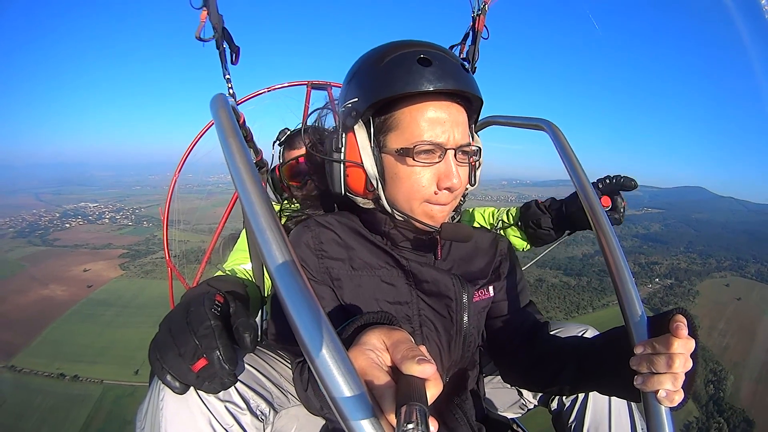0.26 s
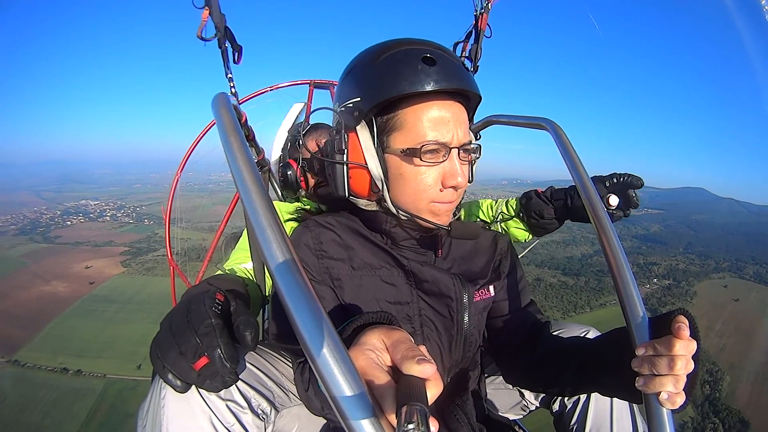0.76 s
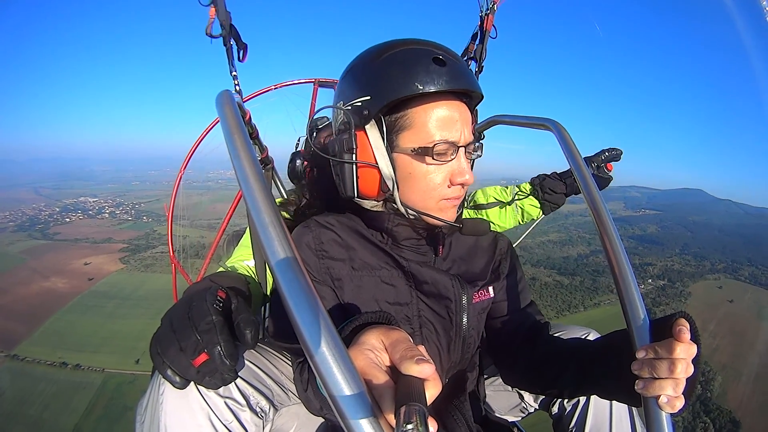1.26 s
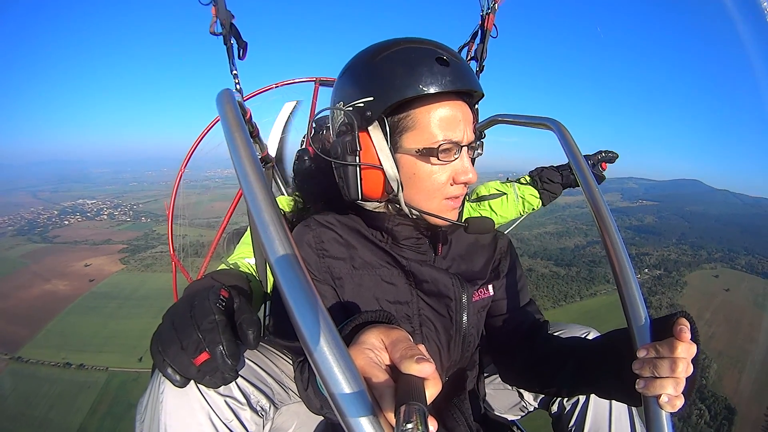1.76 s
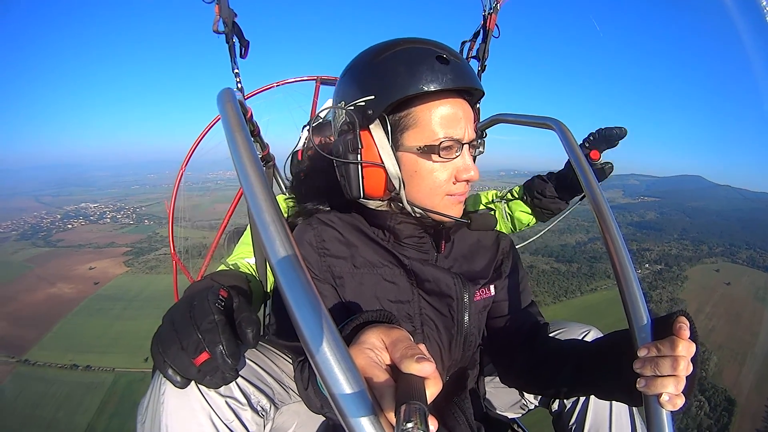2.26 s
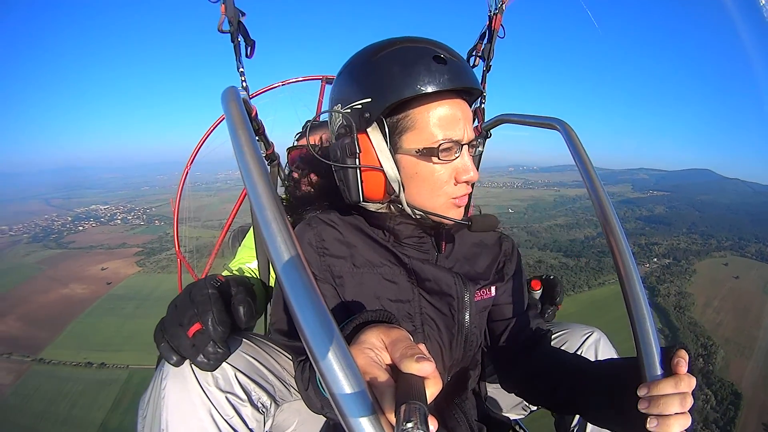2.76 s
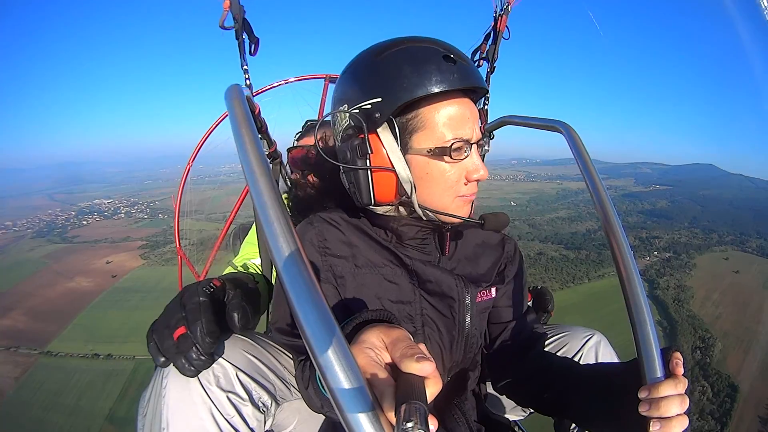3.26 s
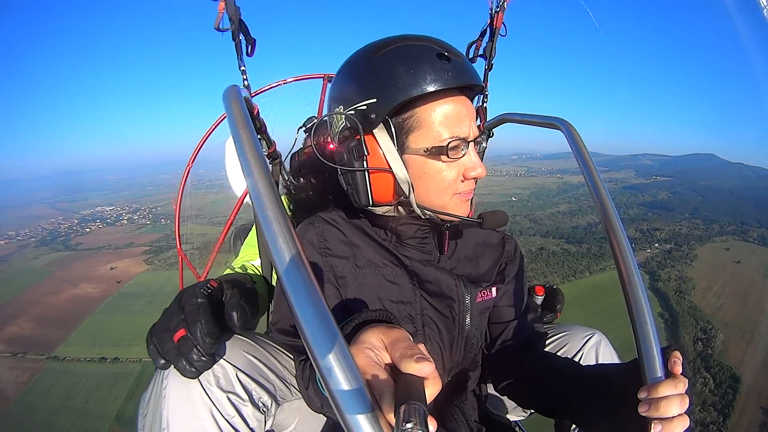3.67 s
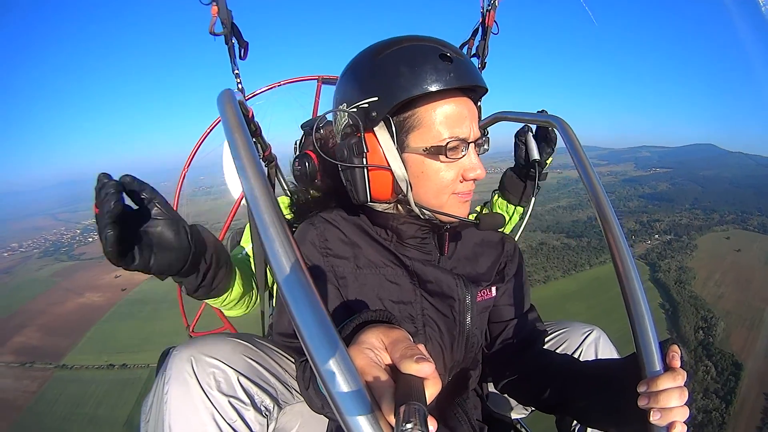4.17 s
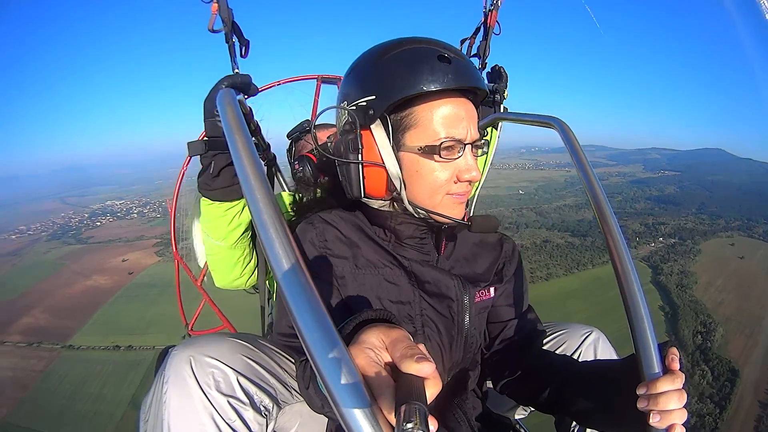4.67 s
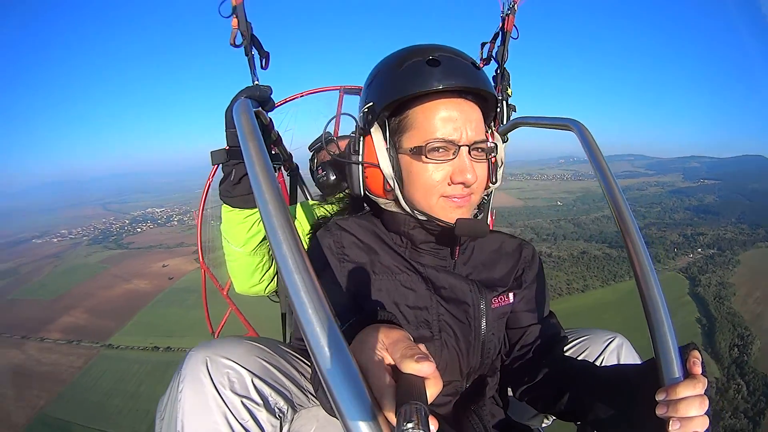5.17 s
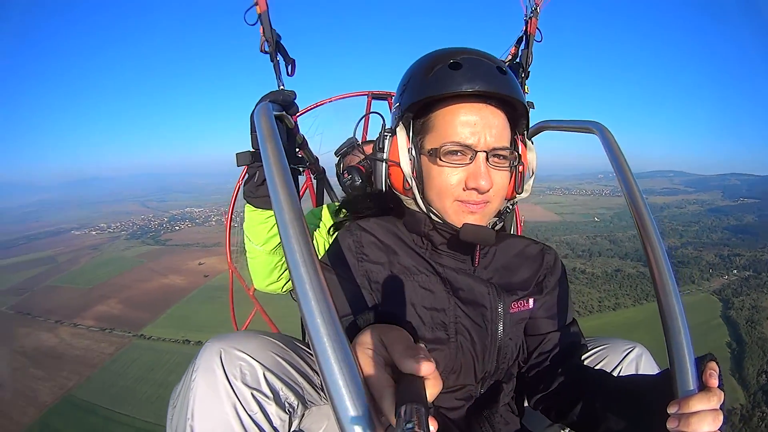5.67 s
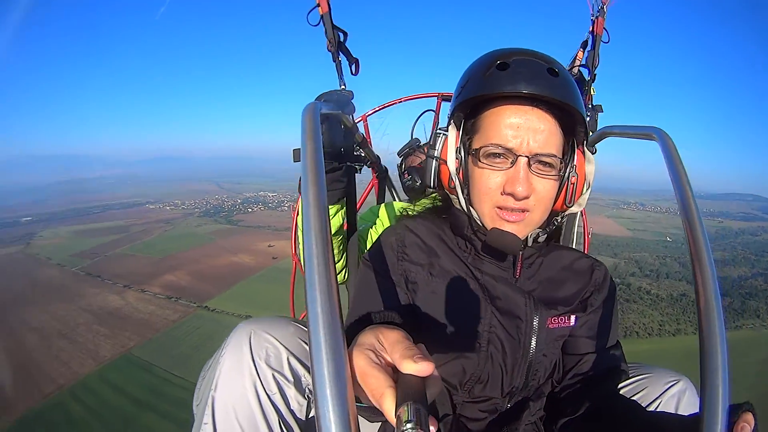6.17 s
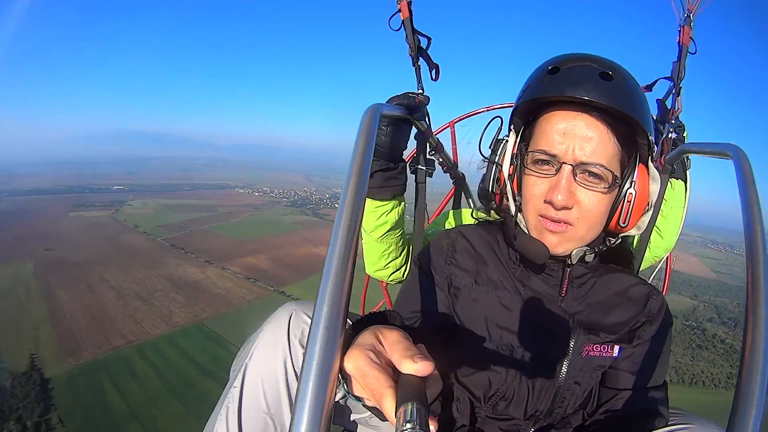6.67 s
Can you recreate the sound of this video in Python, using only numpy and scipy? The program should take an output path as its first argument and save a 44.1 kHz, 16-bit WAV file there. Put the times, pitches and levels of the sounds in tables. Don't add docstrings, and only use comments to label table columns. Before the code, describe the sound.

From 0 to almost 7 seconds a small two-stroke engine runs without pause, its firing rate near 143 to 145 per second, wavering only slightly. Close to the camera, a three-blade propeller in a cage makes a dense fluttering rush, about 84 beats a second, ringing hard around 1.5 and 2.6 kilohertz. Bright hiss, leaning left at first, and a cluster of thin gear whines near 4 to 7 kilohertz sit over low exhaust and blade hums. About 28 times a second a knock ticks and thuds through the mount, briefly dipping the airborne sound, with low hum and wind beneath. At 4.6 to 5.2 seconds the grip loosens in an uneven rattle; only a few faint knocks follow to 5.8. Hum and wind recede, exhaust notes strengthen, and around 6 seconds the tone turns brighter, the whine shifts and the engine becomes more centred. Treble stops near 11 kilohertz.

```python
import sys
import numpy as np
from scipy import signal
from scipy.fft import rfft, irfft, next_fast_len
from scipy.io import wavfile

SR = 44100
rng = np.random.default_rng(int(sys.argv[2]) if len(sys.argv) > 2 else 0)


def gain_from_db(level_db):
    decades = np.asarray(level_db, float) / 20
    return 10 ** decades


def wav_out(sig):
    wavfile.write(sys.argv[1], SR, np.round(np.clip(np.atleast_2d(sig).T, -1, 1) * 32767).astype(np.int16))


N = 305172
SIZE = next_fast_len(N)

# t/s, slackness 0-2
GRIP = [
    (0, 0),
    (4.5, 0.0038),
    (4.85, 0.77),
    (5.3, 1.03),
    (5.95, 1.27),
    (6.5, 1.95),
    (6.92, 2),
]
# t/s, aim 0-3
AIM = [
    (0, 0),
    (1.7, -0.06),
    (2.2, 1),
    (3.85, 1.03),
    (4.3, 2),
    (5.8, 2),
    (6.3, 3),
    (6.92, 3),
]


def blades(turns):
    # aim 0-3, lower ring level/dB, upper ring level/dB, upper ring f/Hz, left-right/dB
    rings = [(0, -27, -23, 2670, 1.5), (1, -27, -23, 2590, 2), (2, -28.5, -22.5, 2560, 1.5),
             (2.1, -29, -22, 2480, 1), (2.6, -28.5, -21.5, 2480, 3), (3, -25, -21, 2850, 1)]
    lower_db, upper_db, upper_hz, pan_db = follow(AIM, rings)
    passes = 3 * turns + .15
    strength = strengths(passes, 2.8)
    spokes = 1 + .25 * np.cos(8 * np.pi * passes)
    rush = (.55 + np.exp(-(passes % 1) / .4) * strength) * spokes
    sizes = gain_from_db(1.8 * np.minimum(rng.exponential(1, (2, N)), 3)) * rng.choice([-1., 1.], (2, N))
    slaps = (rng.random((2, N)) < 500 * np.minimum(rush, 1.6) ** 2 / SR) * sizes
    drive = rush * rng.standard_normal((2, N)) + 0.59 * evened(slaps)
    beat = evened(beats(passes - .03) * strength)

    low_drive = drive + 0.6 * beat
    lower = resonate(resonate(low_drive, 1560, 390), 2210, 900)
    lower += 1.74 * resonate(low_drive, 1605, 82)
    high_drive = drive + 0.51 * gain_from_db(upper_db + 23.5) * beat
    upper = resonate(resonate(high_drive, upper_hz, 585), upper_hz, 2600)
    return ports(gain_from_db(lower_db) * evened(lower) + gain_from_db(upper_db) * evened(upper), pan_db)


def engine(firings):
    # aim 0-3, hiss level/dB, hiss brightness/dB, left-right/dB
    engine_side = [(0, -18.5, -1.5, 8), (1, -19.5, -1, 7.5), (2.1, -20.5, 2, 6.5), (2.7, -19.5, 3, 3),
                   (3, -22, 4.5, .5)]
    # f/Hz, level/dB per Hz
    hiss_spectrum = [(500, -20), (850, -27), (1150, -20), (1560, -6.5), (2050, -9), (2600, -1.5),
                     (3600, -7.5), (4400, -7.5), (5900, -6), (6350, -11), (6850, -8), (7700, -13),
                     (9300, -22.5), (11300, -30)]
    # multiple of firing rate, level/dB, loudest aim 0-3, loss/dB per step of aim
    whine_notes = [(30, -39, 1.2, 2), (31, -41, 0, 2), (33, -39, 3, 5), (35, -39, 1.6, 5),
                   (38, -38, 2.2, 14), (39, -40, 2.6, 6), (40, -37, 2.2, 12), (41, -36, 2.1, 8),
                   (42, -32, 2, 9), (42, -33, 3, 16), (43, -40, 0, 9), (44, -38, 3, 16), (45, -39, 2.1, 6),
                   (46, -41, 0, 8), (47, -37, 1.1, 4), (47, -36, 3, 10), (48, -35, 3, 16), (49, -38, 3, 12),
                   (51, -44, 0, 2)]
    hiss_db, bright_db, pan_db = follow(AIM, engine_side)
    puffs = (1 + .5 * np.exp(-(firings % 1) / 0.27)) * gain_from_db(0.84 * drift(16)[0])
    one_rattle = rng.standard_normal(306)
    rattle = signal.oaconvolve(beats(firings), one_rattle)[:N]
    rattle = evened(resonate(rattle, 5260, 5000))
    hiss = colour(puffs * rng.standard_normal((2, N)) + .16 * rattle, hiss_spectrum)
    hiss += (gain_from_db(bright_db) - 1) * resonate(hiss, 8800, 4400)

    aim, whine = curves(AIM)[0], np.zeros(N)
    wobble = firings + 0.002 * drift(30)[0]
    for (k, db, best, lost_db), fade in zip(whine_notes, drift(14, count=len(whine_notes))):
        level_db = db + 7.5 - lost_db * abs(aim - best) + 2.4 * fade
        whine += gain_from_db(level_db) * np.cos(2 * np.pi * (k * wobble + rng.random()))
    skew = 0.047 * pan_db * np.roll(whine, shift=2) * [[1], [-1]]
    panned = whine * gain_from_db([pan_db / 2, -pan_db / 2]) / gain_from_db(0.12 * abs(pan_db))
    return ports(gain_from_db(hiss_db) * hiss, pan_db) + skew + panned


def notes(cycles, orders, level_db):
    out = np.zeros((2, N))
    for (k, db), waver in zip(orders, drift(8, count=len(orders))):
        start = rng.random() + .12 * rng.random((2, 1))
        out += gain_from_db(db + 1.1 * waver) * np.cos(2 * np.pi * (k * cycles + start))
    return gain_from_db(level_db) * evened(out)


def shaft_notes(firings, turns):
    # slackness 0-2, exhaust level/dB, blade level/dB, frame buzz level/dB
    note_levels = [(0, -43, -42.5, -43.5), (.9, -40.5, -44, -46), (1.1, -36, -45.5, -47),
                   (2, -34, -44, -47)]
    # multiple of firing rate, level/dB
    exhaust = [(.5, -15), (1, -2), (1.5, -18), (2, -1), (2.5, -3), (3, -23), (8, -8), (8.5, -8.5)]
    # multiple of blade passing rate, level/dB
    blade_note = [(1, -14), (2, -12), (3, -1.5), (4, -2), (5, -14), (6, -10), (7, -9.5), (8, -10.5),
                  (9, -13.5), (11, -23), (12, -12.5), (13, -10.5)]
    exhaust_db, blade_db, frame_db = follow(GRIP, note_levels)
    frame = gain_from_db(frame_db) * np.sqrt(2) * np.cos(2 * np.pi * firings) * [[1], [-1]]
    return frame + notes(firings, exhaust, exhaust_db) + notes(3 * turns, blade_note, blade_db)


def knocks(turns):
    # t/s, peak level/dB
    strays = [(4.621, -34.5), (4.644, -23), (4.686, -21), (4.718, -25), (4.75, -24), (4.835, -25),
              (4.939, -25), (5.006, -23.5), (5.041, -25.5), (5.075, -26), (5.107, -26), (5.145, -23),
              (5.2, -31), (5.416, -31), (5.475, -30), (5.72, -31), (5.81, -29)]
    steady_until = 4.6
    draw = rng.standard_normal((int(turns[-1]), 2))
    at = np.searchsorted(turns, np.arange(len(draw)) + .25 + .05 * draw[:, 0])
    train = np.zeros(N)
    heights = gain_from_db(2.8 * np.clip(draw[:, 1], -3, 1.1))
    train[np.clip(at, 0, N - 1)] = heights * (at < steady_until * SR)
    s, peak_db = np.transpose(strays)
    train[((s - .004) * SR).astype(int)] = gain_from_db(peak_db + 22.5)
    return train


def mount(turns, train):
    # slackness 0-2, hum level/dB, wind level/dB, shake level/dB, rumble level/dB
    carried = [(0, -34.5, -40, -51, -49), (1.2, -40.5, -49.5, -49, -43.5), (2, -46, -49.5, -70, -53)]
    # f/Hz, level/dB per Hz
    wind_spectrum = [(60, -8), (130, -12), (220, 3), (350, 1.5), (600, -2.5), (900, -24), (1400, -59)]
    hum_db, wind_db, shake_db, rumble_db = follow(GRIP, carried)
    t = np.arange(1500) / SR
    buzz = rng.standard_normal((3, N))

    tick = np.exp(-((t - .0018) / 0.00035) ** 2) * np.cos(2 * np.pi * 2500 * t)
    ticks = evened(signal.oaconvolve(np.minimum(train, 1.5), tick)[:N]) * gain_from_db([[4], [-4]])
    sign = np.sign(drift(40)[0] + .4)
    late_push = np.exp(-((t - .005) / 0.00012) ** 2)
    shove = signal.oaconvolve(train ** 0.54 * sign, late_push)[:N] * [[1.2], [.9]]
    thud = evened(resonate(resonate(resonate(shove, 219, 69), 242, 264), 300, 420))
    burst = signal.oaconvolve(train ** .6, np.exp(-((t - .005) / .003) ** 2))[:N]
    crack = burst * (buzz[:2] - 0.19 * buzz[1::-1])
    crack = evened(resonate(resonate(crack, 455, 410), 550, 480)) * gain_from_db([[-9], [-6]])
    hits = gain_from_db(-34) * (thud + crack + ticks)

    flutter = evened(buzz[2] * (rng.random(N) < 120 / SR))
    hum_drive = buzz[:2] + 0.64 * buzz[2] + 0.5 * flutter
    hum = evened(resonate(resonate(hum_drive, 201.5, 53), 258, 117)) * gain_from_db([[-2.5], [2.5]])
    shake = np.sqrt(2) * np.cos(2 * np.pi * (turns + 0.2))
    gusts = buzz[2] + .4 * rng.standard_normal((2, N))
    rumble = evened(resonate(resonate(gusts, 80, 93), 78, 100))

    gust_db = (2.5 + 2.2 * np.sin(np.pi / 2 * curves(GRIP)[0])) * drift(30)[0]
    gust_db = gust_db + 1.2 * drift(30, count=2)
    wind = colour(rng.standard_normal((2, N)) * gain_from_db(gust_db), wind_spectrum)
    wind[1] = 0.69 * wind[0] + 2.0 * wind[1]
    steady = gain_from_db(hum_db) * hum + gain_from_db(shake_db) * shake + gain_from_db(rumble_db) * rumble
    return hits + steady + gain_from_db(wind_db) * wind


def ducking(train):
    t = np.arange(1500) / SR
    dip = (1 - np.exp(-t / 0.000049)) * np.exp(-(t / 0.014) ** 2)
    return 7 * signal.oaconvolve(np.minimum(train, 1.8), dip)[:N]


def ports(pair, pan_db):
    # f/Hz, likeness 0-1
    likeness = [(700, 0.33), (1200, 1), (2400, 0.66), (4500, 0.96), (10000, 0.59)]
    # f/Hz, lead/radians
    left_lead = [(700, -2.5), (1200, -2), (1800, 0.73), (2500, 1.89), (3500, 0.8), (10000, 0.14)]
    same = np.clip(read(likeness), 0, 1)
    a, b = rfft(pair, SIZE)
    shared = same * np.exp(-1j * read(left_lead)) * a
    right = irfft(shared + np.sqrt(1 - same ** 2) * b, SIZE)[:N]
    return np.array([pair[0] * gain_from_db(pan_db / 2), right / gain_from_db(pan_db / 2)])


def resonate(x, hz, width):
    r = np.exp(-np.pi * width / SR)
    if np.ndim(hz) == 0:
        return 2 * signal.lfilter([1 - r], [1, -r * np.exp(2j * np.pi * hz / SR)], x).real
    turn = np.exp(2j * np.pi * np.cumsum(hz) / SR)
    return 2 * (turn * signal.lfilter([1 - r], [1, -r], x * turn.conj())).real


def beats(cycles):
    return np.diff(np.floor(cycles), prepend=np.floor(cycles[0]))


def strengths(cycles, spread_db):
    return gain_from_db(spread_db * rng.standard_normal(int(cycles[-1]) + 2))[cycles.astype(int)]


def drift(hz, count=1):
    t = np.arange(0, N + 256, 256) / SR
    f, start = np.geomspace(hz / 8, hz, num=16), rng.random((count, 16, 1))
    slow = np.sin(2 * np.pi * (f[:, None] * t + start)).sum(1) / np.sqrt(8)
    return np.array([np.interp(np.arange(N) / SR, t, row) for row in slow])


def evened(x):
    return x / np.sqrt(np.mean(x ** 2) + 1e-20)


def read(points):
    f, value = np.transpose(points)
    return np.interp(np.log(np.fft.rfftfreq(SIZE, 1 / SR) + 1), np.log(f), value)


def colour(x, points):
    return evened(irfft(rfft(x, SIZE) * gain_from_db(read(points)), SIZE)[:, :N])


def curves(rows):
    s, *columns = np.transpose(rows)
    return [np.interp(np.arange(N) / SR, s, c) for c in columns]


def follow(control, rows):
    at, *columns = np.transpose(rows)
    return [np.interp(curves(control)[0], at, c) for c in columns]


def scene():
    # t/s, firing rate f/Hz
    speed = [(0, 143.0), (0.3, 142.98), (0.6, 142.62), (1.4, 142.59), (1.8, 143.06), (2.1, 144.0),
             (2.7, 144.08), (3.3, 143.97), (3.6, 143.56), (4.2, 144.62), (5.1, 144.95), (5.4, 144.82),
             (5.7, 144.44), (6.0, 144.36), (6.6, 143.8), (6.92, 143.72)]
    firings = np.cumsum(curves(speed)[0]) / SR
    turns = firings / 5.158 + .02
    train = knocks(turns)
    duck_db = ducking(train)
    airborne = blades(turns) / gain_from_db(0.34 * duck_db) + engine(firings) / gain_from_db(duck_db)
    return airborne + shaft_notes(firings, turns) + mount(turns, train)


def low_pass(x):
    return signal.sosfilt(signal.butter(12, 11500, fs=SR, output="sos"), x)


def record(dry):
    edge = signal.firwin(1501, 11090, window=("kaiser", 9), fs=SR)
    limited = 1.1 * np.tanh(dry / 1.1)
    mix = signal.oaconvolve(limited, edge[None], "same")
    return low_pass(mix)


dry = scene()
out = record(dry)
wav_out(out)
```